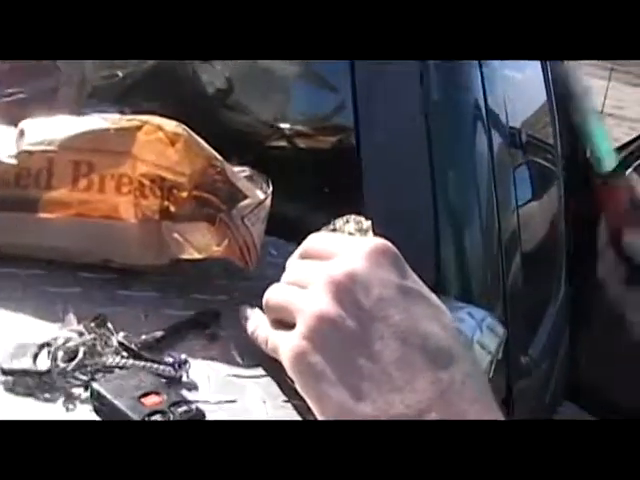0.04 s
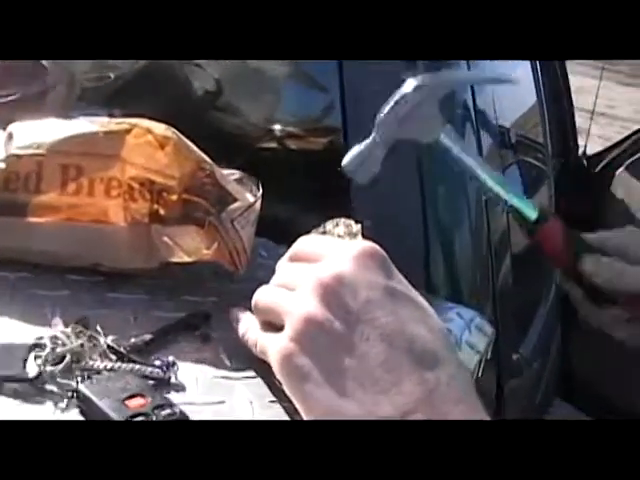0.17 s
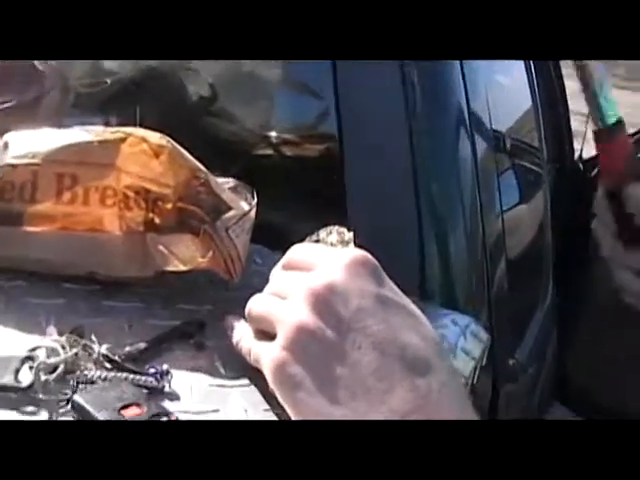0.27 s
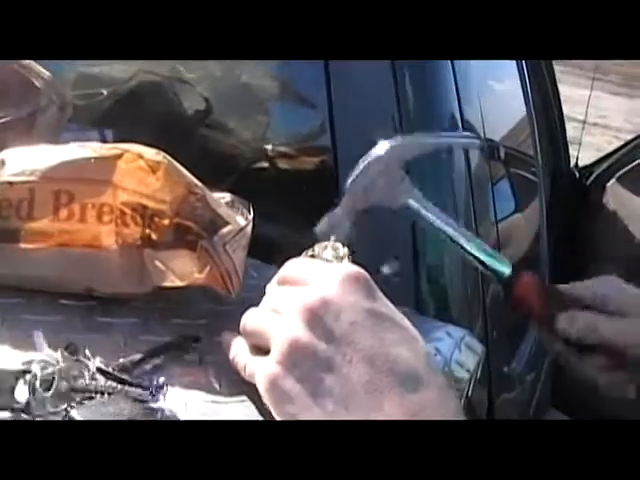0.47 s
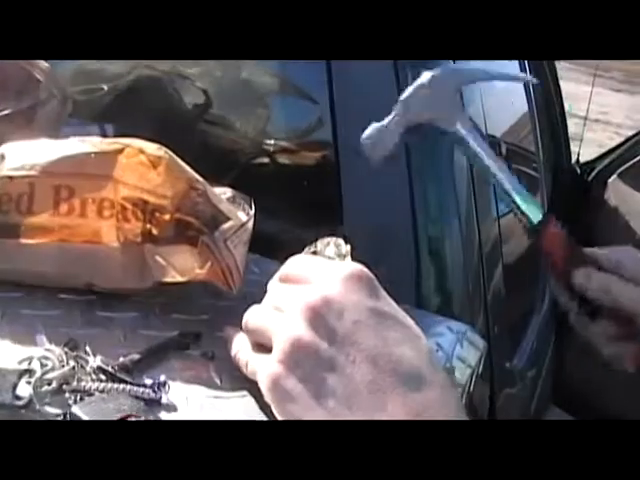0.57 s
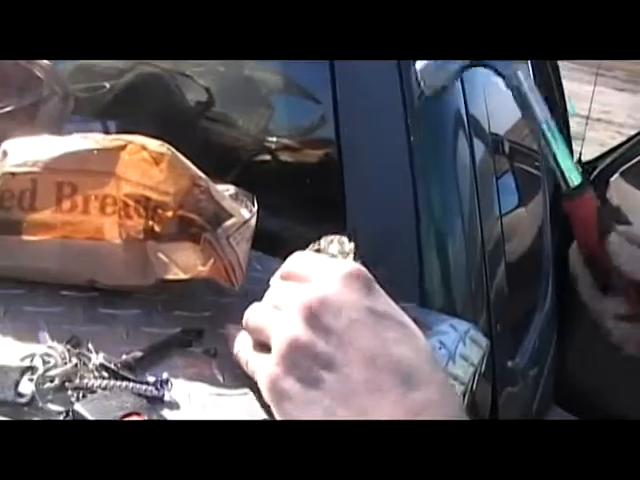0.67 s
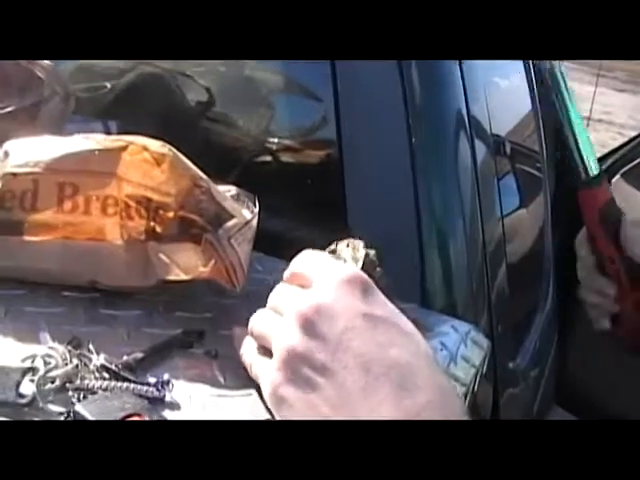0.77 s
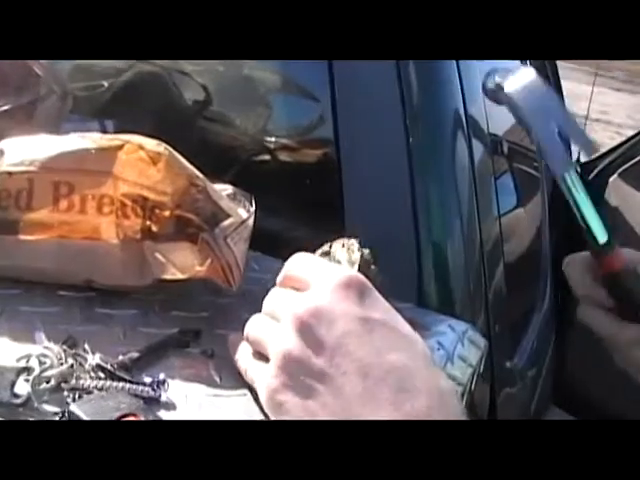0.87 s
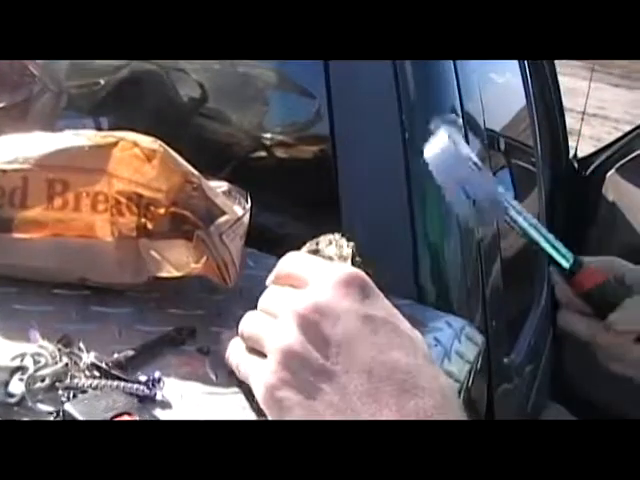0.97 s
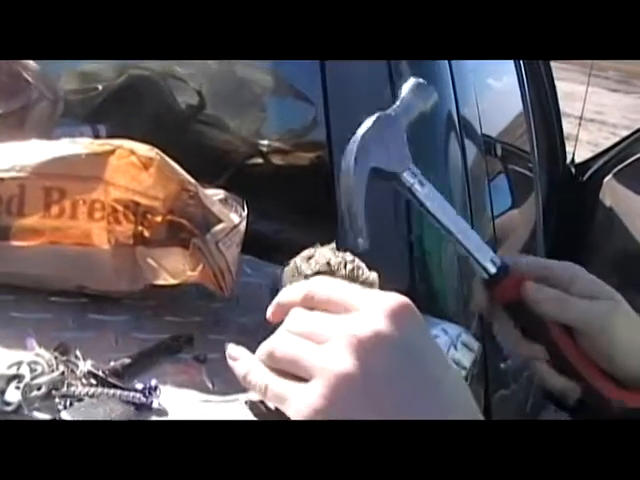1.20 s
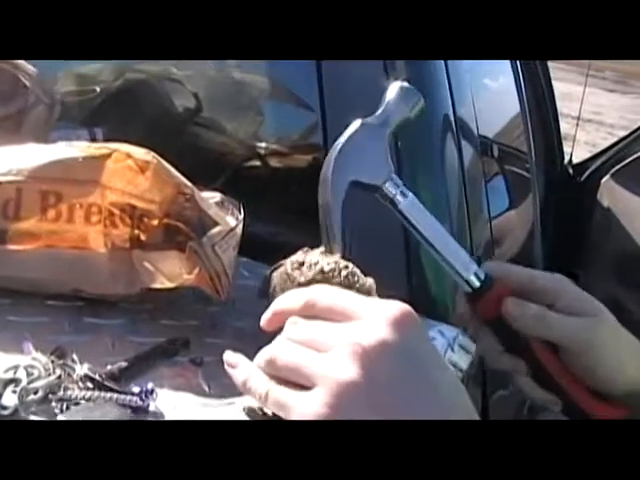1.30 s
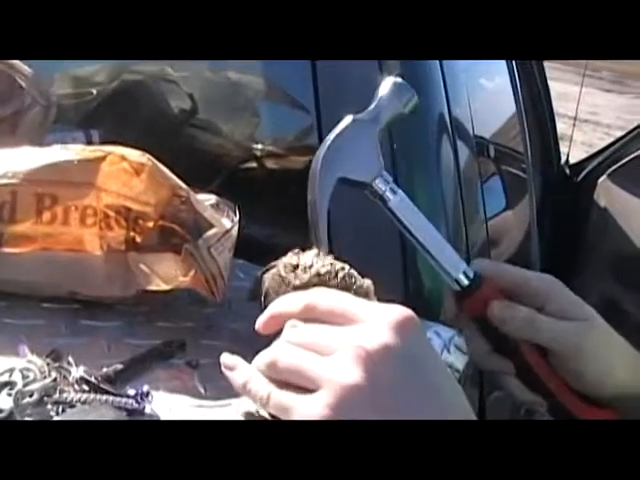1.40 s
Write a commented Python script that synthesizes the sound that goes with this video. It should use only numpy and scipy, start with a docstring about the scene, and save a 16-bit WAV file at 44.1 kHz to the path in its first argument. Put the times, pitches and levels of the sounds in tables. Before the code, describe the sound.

Two sharp, clanging hammer blows on a metal panel, each followed by loose parts clattering.

```python
"""A soft bump and a rattle outdoors, then two loud, close blows: a claw hammer strikes a small hard lump
held on a vehicle's steel tread plate. Each blow cracks, rings the panel and overloads the recorder;
keys and loose parts jump and clatter back, and the vehicle's body hums on.
Then the hand turns the lump over with a few faint knocks, ticks and clinks."""
import sys
import numpy as np
from scipy import signal
from scipy.fft import rfft, irfft
from scipy.io import wavfile
from scipy.ndimage import uniform_filter1d

SR = 44100
rng = np.random.default_rng(int(sys.argv[2]) if len(sys.argv) > 2 else 0)


def digitize_waveform(pressure):
    """Quantize a signal to 16-bit integers and store it at the path in sys.argv[1].

    Rows of a 2-D input are taken as channels; values are limited to [-1, 1].
    """
    field = np.atleast_2d(pressure).T
    bounded = np.clip(field, -1, 1)
    quanta = np.round(bounded * 32767).astype(np.int16)
    wavfile.write(sys.argv[1], SR, quanta)


N = 63945
T = np.arange(N) / SR
HZ = np.fft.rfftfreq(2 * N, 1 / SR)

# Stereo spread of all noise. Each row: frequency in Hz, side over mid in dB.
STEREO_WIDTH = [(30, -8.5), (60, -10.5), (200, -16.5), (700, -16), (1300, -13), (2400, -11), (4400, -9),
                (8000, -7), (15000, -4.5)]
# Tone of the outdoor bed. Each row: frequency in Hz, relative level in dB.
AIR_COLOUR = [(25, -21), (45, -14), (65, -4), (105, -0.5), (160, -13.5), (225, -3), (400, -10),
              (640, -13.5), (1100, -19.5), (1800, -20.5), (2800, -29.5), (10500, -30), (12300, -37),
              (13500, -61.5)]
# Its slow swells. Each row: time in seconds, level in dB.
AIR_SWELLS = [(0, -48), (.35, -56.5), (.62, -50), (.85, -58.5), (1.0, -57.5), (1.2, -55), (1.45, -53)]
# Low bumps of lump, hand and flexing plate.
# Each row: start in seconds, level in dB, centre in Hz, width in octaves, 60 dB decay (t60) in seconds.
LOW_BUMPS = [(.004, -38, 97, .4, .15), (.160, -24, 83, 0.35, .22), (.502, -22.5, 75.9, 0.27, 0.15),
             (1.0, -52, 80.2, 0.44, 0.44), (1.199, -40.5, 100.6, 0.53, 0.21),
             (1.293, -40.5, 220, 0.48, 0.17), (1.309, -34.5, 220, 0.38, 0.07), (1.385, -73, 219, .5, 0.51)]
# Ticks of crumbs, keys and fingers, with the same columns as the bumps.
SMALL_TICKS = [(.618, -46, 8300, 0.43, 0.029), (.649, -47.5, 8240, 0.51, 0.02),
               (.670, -47, 7500, .8, 0.035), (.683, -50, 7060, 1.6, 0.093), (.718, -56.5, 1800, 2, 0.18),
               (.758, -54.5, 1280, 0.32, 0.072), (1.130, -66.5, 1420, 0.36, 0.063),
               (1.220, -50, 2120, 1.74, 0.12), (1.291, -51, 4500, .8, 0.053),
               (1.308, -48.5, 8000, 0.47, 0.036), (1.313, -45.5, 930, 0.73, 0.036),
               (1.343, -59.5, 4040, .5, .08), (1.366, -52.5, 4030, 0.46, 0.094)]
# Top-end sparkle of those touches. Each row: frequency in Hz, gain in dB.
TOUCH_EQ = [(10000, 1.5), (12500, 6.5), (14000, -27)]
# Loose parts landing.
# Each row: start in seconds, burst level in dB, panel level in dB, rise in seconds, t60 in seconds.
LANDINGS = [(.013, -34.5, -21.5, 0.0018, 0.11), (.021, -23.5, -32, .001, 0.15),
            (.171, -21.5, -22.5, .004, 0.41), (0.203, -20.5, -14.5, 0.0011, 0.28),
            (.238, -27, -35, 0.0091, 0.18), (0.29, -28, -32.5, 0.01, 0.17),
            (0.3995, -35, -31, 0.00045, .12), (.503, -25.5, -22, 0.015, 0.16),
            (.522, -20.5, -21.5, 0.0096, 0.19)]
# Tone of the clatter. Each row: frequency in Hz, relative level in dB.
CLATTER_COLOUR = [(30, -16), (50, -10), (78, 1), (150, 1), (400, -2.5), (750, -3), (2000, -2), (2700, -5.5),
                  (3050, -4), (3700, -8), (10500, -5), (13500, -7), (15000, -41)]
# Its lows hang on longest. Each row: frequency in Hz, multiple of the landing's t60.
CLATTER_DECAY = [(80, 2), (1000, 1.0), (10000, 0.77)]
# The steel panel's ring. Each row: pitch in Hz, level in dB, t60 in seconds.
PANEL_MODES = [(79.7, -25.5, 0.25), (127.6, -26, 0.36), (180, -26, 0.26), (219.3, -12, 0.12),
               (255.3, -12.5, 0.17), (369.2, -19, 0.17), (529.8, -13, 0.1), (700.2, -15, .13),
               (772.4, -13.5, 0.089), (825.5, -16.5, 0.11), (927, -14, 0.09), (1099, -20.5, .18),
               (1443, -18.5, .17), (1583, -20, 0.098), (1803, -20.5, 0.17), (1880, -20.5, 0.1),
               (2020, -25.5, 0.11)]
# The hammer blows. Each row: start in seconds, panel level in dB, crash level in dB,
# rebound delay in seconds, rebound relative to the blow in dB, body hum level in dB.
HAMMER_BLOWS = [(0.1079, 2, -11, .022, -14, -47), (0.4471, 3, -11.5, .023, -8.5, -34.5)]
# Tone of a blow's crack and crash. Each row: frequency in Hz, relative level in dB.
CRASH_COLOUR = [(30, -17.5), (100, -8.5), (250, 0.5), (430, -3), (800, -2.5), (1250, -5.5), (1900, -2),
                (2700, -6.5), (3100, -7), (3700, -9.5), (9500, -8.5), (13000, -12.5), (15500, -27)]
# The crash's tail. Each row: frequency in Hz, t60 in seconds before stretching.
CRASH_DECAY = [(100, .19), (800, 0.28), (2000, .17), (5000, .18), (13000, .18)]
# The vehicle body's long hum. Each row: pitch in Hz, level in dB, t60 in seconds.
BODY_MODES = [(98, 0, 1.3), (212.2, -1, 1.1), (1160, -11.5, 0.47)]
# The lump's knock. Each row: pitch in Hz, level in dB, t60 in seconds.
LUMP_MODES = [(1160, -6.5, 0.089), (1303, 3.5, 0.052), (1438, -7, 0.066), (2040, -12, 0.11),
              (2640, -11, 0.067)]
# A light metal clink. Each row: pitch in Hz, level in dB, t60 in seconds.
CLINK_MODES = [(3000, -13.5, 0.18), (3510, -10, 0.087), (4350, -6.5, 0.086), (5040, -9.5, 0.062),
               (5830, 0, 0.051), (7200, -13.5, 0.052), (9820, -3.5, 0.065)]
# Clinks as the grip changes. Each row: start in seconds, level in dB.
GRIP_CLINKS = [(1.218, -54), (1.2898, -47.5), (1.309, -55), (1.342, -63), (1.366, -54.5)]
# Level tilt between the microphones. Each row: frequency in Hz, left over right in dB.
MIC_BALANCE = [(60, 4), (150, 1.5), (400, 2.26), (1200, 1.5), (4000, 1), (8500, 1), (11000, 2), (13000, -4)]
# Phase between their ports. Each row: frequency in Hz, lead of the left in radians.
MIC_PHASE = [(2500, 0.032), (5000, 0.36), (8500, 0.61), (15000, 0.91)]

PANEL_ATTACK_S, CRACK_T60_S, CRACK_DB = 0.00039, 0.029, -11
MODE_SCATTER_DB, LINE_WIDTH_HZ = 1.83, 4.3  # modes vary from hit to hit; buzzing contacts blur them
GRAIN_HZ, GRAIN_DB = 537, 1  # rate and spread of the tiny contacts
RIPPLE_HZ, RIPPLE_DB = 50.09, 4  # spacing and depth of the plate's crowded resonances
LOW_CUT_HZ, TOP_HZ = 110, 15000
CLIP_CEILING, CLIP_HARDNESS = 0.97, 3


def amp(db):
    return 10 ** (np.asarray(db) / 20)


def unit_rms(x):
    return x / np.sqrt(np.mean(x ** 2) + 1e-20)


def attack(seconds):
    return 1 - np.exp(-T / seconds)


def decay(t60):
    return np.exp(-np.log(1000) * T / t60)


def curve(points, hz=HZ):
    """Join (Hz, value) points along a log frequency axis."""
    freqs, values = np.transpose(points)
    return np.interp(np.log(hz + 1), np.log(freqs + 1), values)


def eq(x, gain):
    """Apply one gain per frequency."""
    return irfft(rfft(x, 2 * N) * gain)[..., :N]


def at(start, x):
    """Place a sound on the timeline, in seconds."""
    silence = np.zeros(x.shape[:-1] + (round(start * SR),))
    return np.concatenate([silence, x], axis=-1)[..., :N]


def pan(db):
    """Left up and right down, each by db."""
    return amp(np.array([[db], [-db]]))


def noise(colour_db):
    """Coloured stereo noise of rms 1, widest in the treble."""
    width = amp(curve(STEREO_WIDTH))
    gains = amp(colour_db) * np.array([np.ones_like(width), width]) / np.hypot(1, width)
    mid, side = eq(rng.standard_normal((2, N)), gains)
    return unit_rms(np.array([mid + side, mid - side]))


def outdoor_air():
    """A quiet, low bed of noise that swells and sinks."""
    level_db = np.interp(T, *np.transpose(AIR_SWELLS))
    return noise(curve(AIR_COLOUR)) * amp(level_db) * pan(0.5)


def touches(rows, attack_s):
    """Small dead contacts, each a short band of noise: bumps down low, ticks up high."""
    out = np.zeros((2, N))
    for start, db, centre, octaves, t60 in rows:
        distance = np.log2((HZ + 1) / centre) / octaves
        band_db = -20 * np.log10(1 + distance ** 2)
        out += at(start, amp(db) * noise(band_db) * decay(t60) * attack(attack_s))
    return eq(out, amp(curve(TOUCH_EQ))) * pan(-0.24)


def contact_burst(colour_db, decays, hold_s, stretch):
    """Noise roughened by tiny contacts; after a hold, each band dies at its own speed."""
    wash = noise(colour_db)
    grain_db = GRAIN_DB * np.interp(T * GRAIN_HZ, np.arange(N), rng.standard_normal(N))
    hz, t, bands = signal.stft(wash * unit_rms(amp(grain_db)), SR, nperseg=256)
    t60 = stretch * curve(decays, hz)[:, None]
    loss_db = 60 * np.maximum(t - hold_s, 0) / t60
    return signal.istft(bands * amp(-loss_db), SR, nperseg=256)[1][:, :N]


def ring(modes, loose=False):
    """Struck modes start together under a hard blow, out of step under loose contacts."""
    out = np.zeros(N)
    for hz, db, t60 in modes:
        jitter = uniform_filter1d(rng.standard_normal(N), size=200)
        blur = np.cumsum(jitter) * np.sqrt(2 * np.pi * LINE_WIDTH_HZ / SR)
        phase = 2 * np.pi * (hz * T + loose * rng.random()) + blur
        level = amp(db + MODE_SCATTER_DB * rng.standard_normal())
        out += level * decay(t60) * np.sin(phase)
    return out * attack(PANEL_ATTACK_S)


def loose_parts(ripple_db):
    """Keys and fittings land in bright bursts that also stir the panel."""
    out = np.zeros((2, N))
    colour_db = curve(CLATTER_COLOUR) + ripple_db
    for start, db, panel_db, rise, t60 in LANDINGS:
        burst = contact_burst(colour_db, CLATTER_DECAY, hold_s=rise, stretch=t60)
        burst *= np.minimum(T / rise, 1)
        out += at(start, amp(db) * burst + amp(panel_db) * ring(PANEL_MODES, loose=True))
    return out * pan(0.08)


def crash(colour_db):
    """The struck plate's crowded resonances merge into one splash of noise."""
    return contact_burst(colour_db, CRASH_DECAY, hold_s=0.0093, stretch=0.97) * attack(PANEL_ATTACK_S)


def hammer(ripple_db):
    """The head cracks on contact, rings panel and body under a crash, then rebounds and lands again."""
    out = np.zeros((2, N))
    colour_db = curve(CRASH_COLOUR) + ripple_db
    for start, panel_db, crash_db, rebound_s, rebound_db, hum_db in HAMMER_BLOWS:
        crack = amp(CRACK_DB) * noise(colour_db) * decay(CRACK_T60_S)
        clang = amp(panel_db) * ring(PANEL_MODES) + amp(crash_db) * crash(colour_db)
        hum = amp(hum_db) * ring(BODY_MODES)
        rebound = amp(panel_db) * ring(PANEL_MODES, loose=True) + amp(crash_db) * crash(colour_db)
        out += at(start, crack + clang + hum)
        out += at(start + rebound_s, amp(rebound_db) * rebound)
    low_cut = signal.butter(2, LOW_CUT_HZ, "high", fs=SR)  # little deep bass comes through under the blows
    return signal.lfilter(*low_cut, out)


def lump_knock():
    """The hard lump knocks once as it is lifted."""
    return at(1.218, amp(-39) * ring(LUMP_MODES))


def clinks():
    """Metal touches metal and rings faintly as the grip changes."""
    return sum(at(start, amp(db) * ring(CLINK_MODES)) for start, db in GRIP_CLINKS)


def scene():
    """Blows and clatter share the plate's resonances, with handling and outdoor air underneath."""
    ripple_db = RIPPLE_DB * np.interp(HZ / RIPPLE_HZ, np.arange(N), 2 * rng.random(N) - 1)
    ticks = touches(SMALL_TICKS, attack_s=0.00056)
    bumps = touches(LOW_BUMPS, attack_s=0.0077)
    handling = ticks + bumps + clinks() + lump_knock()
    return hammer(ripple_db) + loose_parts(ripple_db) + handling + outdoor_air()


def record(dry):
    """Two microphones, apart in level and phase, feed a band-limited input that the blows overload."""
    split = np.array([[0.5], [-0.5]])  # half to each channel, in opposite directions
    mics = eq(dry, amp(split * curve(MIC_BALANCE)) * np.exp(1j * split * curve(MIC_PHASE)))
    clipped = mics / (1 + np.abs(mics / CLIP_CEILING) ** CLIP_HARDNESS) ** (1 / CLIP_HARDNESS)
    steep_high_cut = 1 / np.sqrt(1 + (HZ / TOP_HZ) ** 160)
    return eq(clipped, steep_high_cut)


dry = scene()
out = record(dry)
digitize_waveform(out)
```